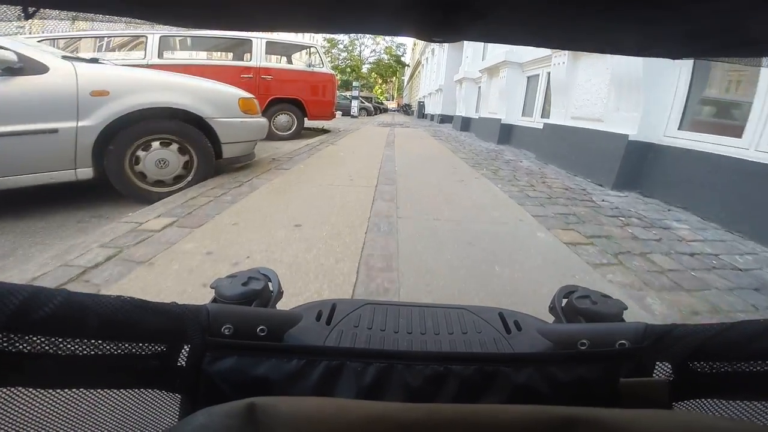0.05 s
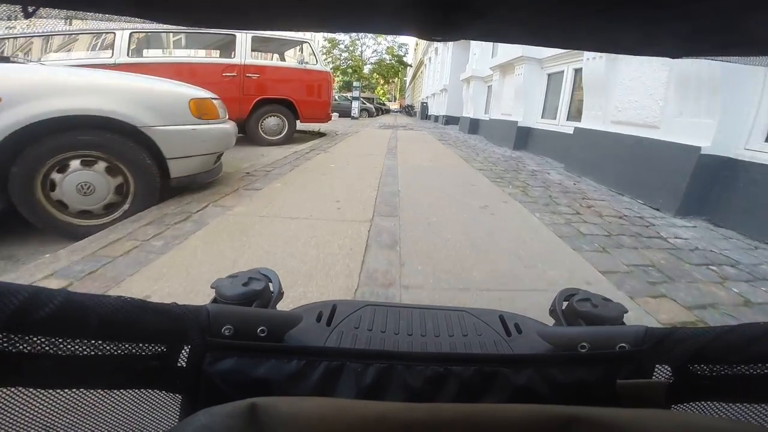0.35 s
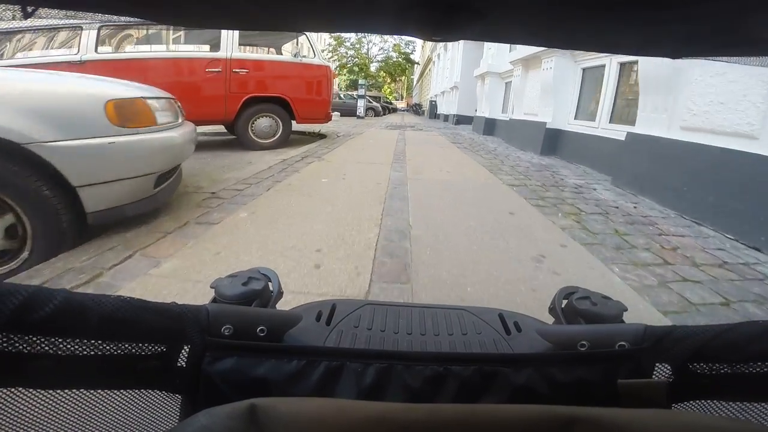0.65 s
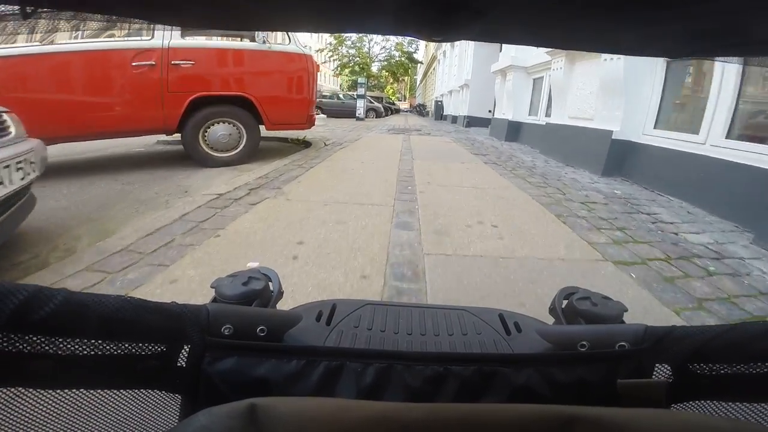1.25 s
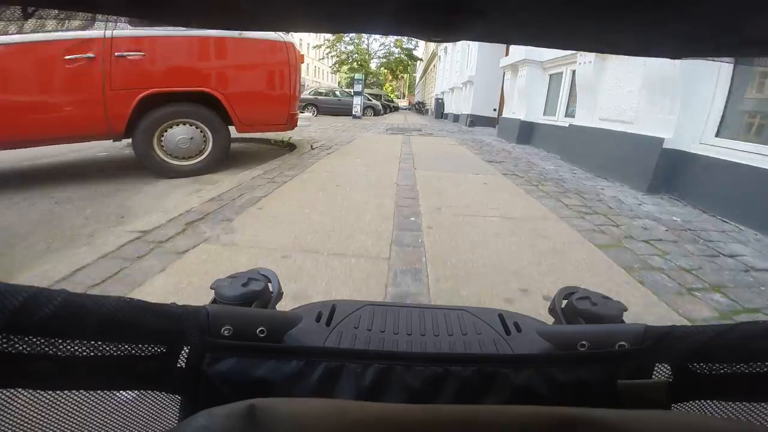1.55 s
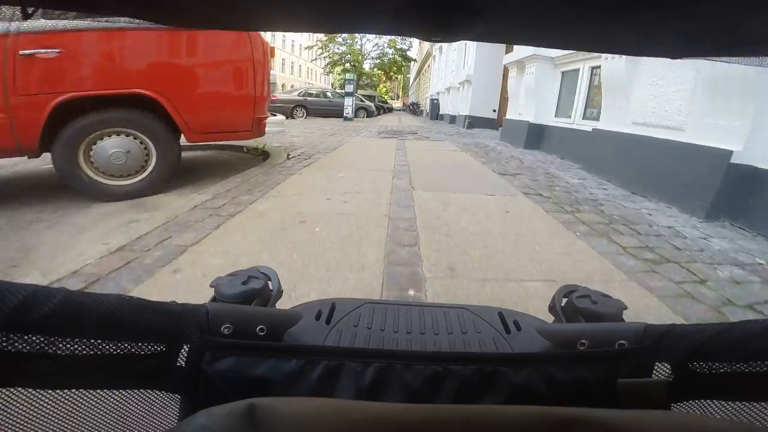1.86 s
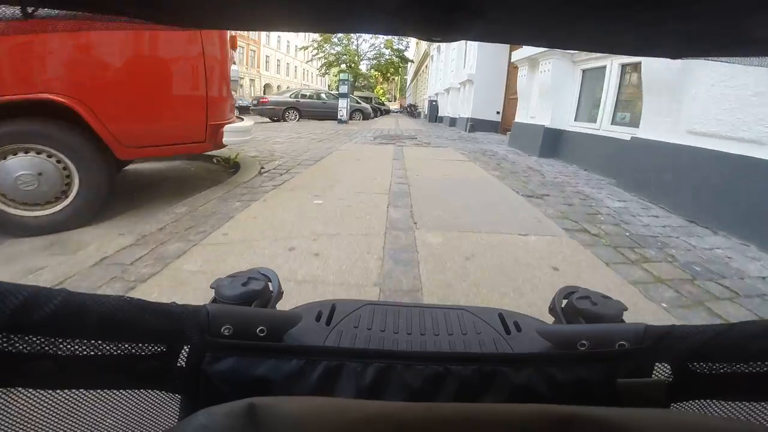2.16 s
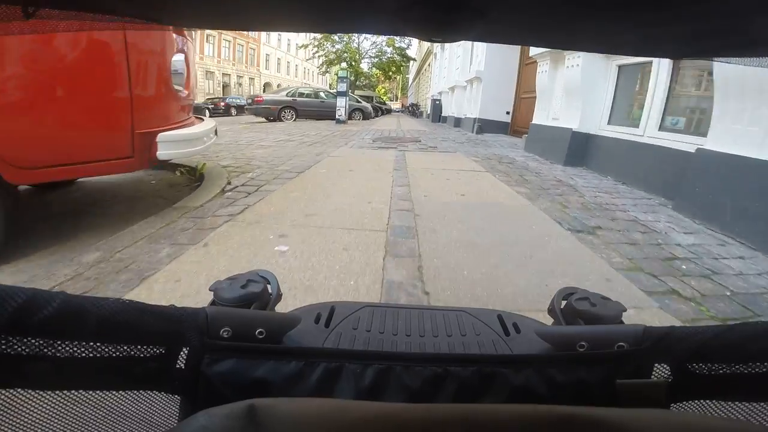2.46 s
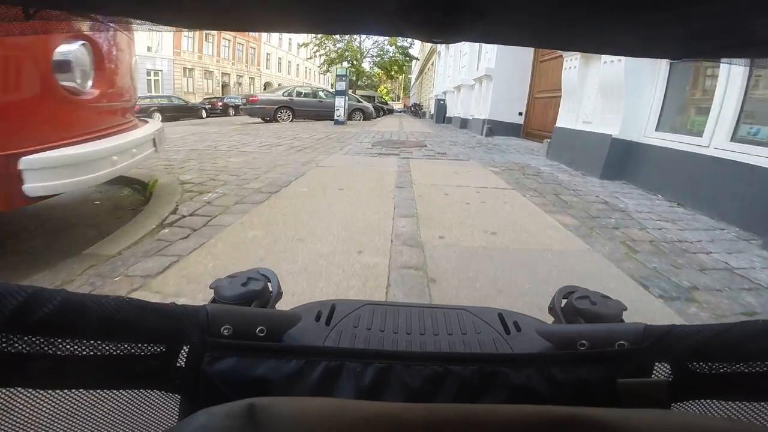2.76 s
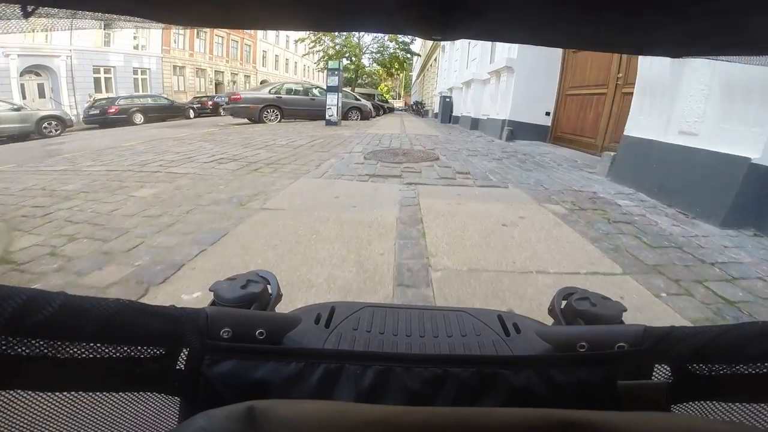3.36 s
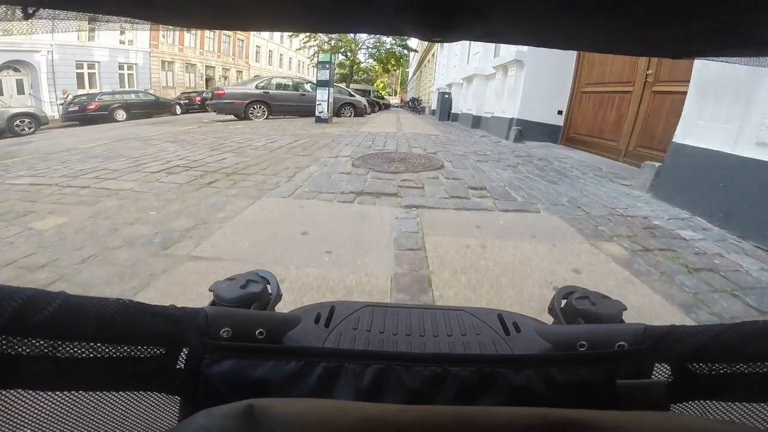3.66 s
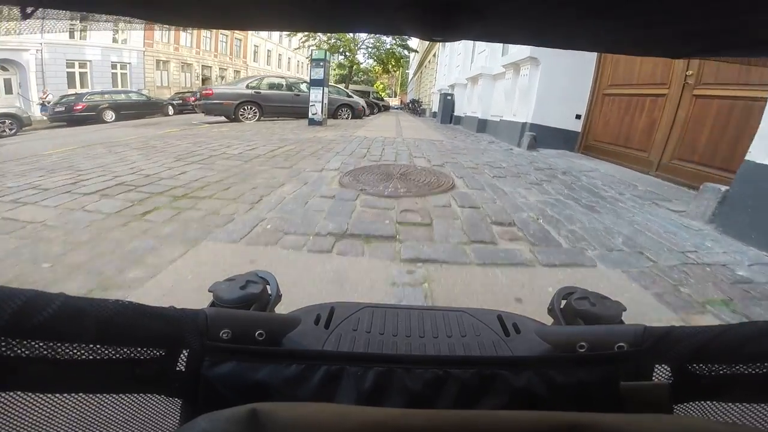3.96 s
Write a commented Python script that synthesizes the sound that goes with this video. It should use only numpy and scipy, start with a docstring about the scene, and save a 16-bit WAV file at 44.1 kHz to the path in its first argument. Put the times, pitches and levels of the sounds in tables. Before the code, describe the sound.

A rolling pram rumbles, bumps and rattles along a pavement, then clacks against a stone edge.

```python
"""Pram rolling on paving slabs, heard from inside the carriage.
Grit under the tyres taps the frame and the sprung body rumbles; slab joints jolt it.
Plastic wheel mounts knock, handle tubes rattle, metal fittings tick, plastic joints creak.
Dry clicks, faint squeaks and rustles come and go. Near the end one stone edge gives a sharp clack."""
import sys
import numpy as np
from scipy import signal
from scipy.fft import rfft, irfft
from scipy.io import wavfile
from scipy.ndimage import uniform_filter1d, minimum_filter1d

SR = 44100
rng = np.random.default_rng(int(sys.argv[2]) if len(sys.argv) > 2 else 0)


def master(y):
    """Save y as 16-bit WAV."""
    cut = np.clip(np.atleast_2d(y).T, -1, 1)
    pcm = np.round(cut * 32767)  # scale
    wavfile.write(sys.argv[1], SR, pcm.astype(np.int16))


N = 176400
TIME_S, RING_TIME_S = np.arange(N) / SR, np.arange(4096) / SR
SCUFF_LEAD_S = 0.007  # a wheel scuffs an edge before it knocks

# rolling rumble: freq_hz, gain_db
RUMBLE_SPECTRUM = [(15, -19), (28, -14.5), (45, -3), (58, 2), (68, 7), (82, -10.5), (100, -10.5),
                   (128, -25.5), (163, -12), (195, -18.5), (310, -18.5), (365, -34.5), (415, -31),
                   (490, -50), (700, -48.5), (1500, -57), (4000, -85)]
# contour of the deep rumble: time_s, level_db
SWAY_CONTOUR = [(0.0, -13), (0.2, -19), (0.38, -21.5), (0.66, -17), (0.78, -19.5), (1.0, -22), (1.49, -20),
                (1.74, -23.5), (2.08, -23), (2.22, -22), (2.33, -19.5), (2.47, -20), (2.58, -23.5),
                (3.3, -24), (3.43, -23.5), (4.0, -25.5)]
# contour of the grit: time_s, level_db
GRIT_CONTOUR = [(0.0, -53), (0.07, -54.5), (0.17, -47.5), (0.37, -47), (0.5, -48), (0.67, -48.5),
                (0.9, -51.5), (1.5, -47), (1.71, -51.5), (2.36, -54.5), (2.52, -52), (3.02, -53.5),
                (3.2, -48), (3.41, -59), (3.6, -47), (3.75, -49), (3.9, -46.5), (4.0, -70)]
# damped crunch of plastic and fabric: freq_hz, gain_db
CRUNCH_SPECTRUM = [(100, -12), (300, 14.5), (550, 4), (1000, 0.5), (1450, -4), (2200, -2), (3050, -22),
                   (3300, -32), (6200, -37.5), (7200, -53), (15000, -67)]
# frame: freq_hz, gain_db, t60_s
FRAME_MODES = [(762, -5.5, .05), (937, -4.5, .035), (988.6, -0.5, .04), (1092, -6, .03), (1276, -7, 0.035),
               (1360, 0, .035), (1426.5, -5, 0.058), (1693, -8, 0.025), (1838, -10, 0.051),
               (1979, -9.5, .04), (2210, -11.5, 0.042), (2403, -9, 0.051)]
# handle tubes: freq_hz, gain_db, t60_s
TUBE_MODES = [(2660, -1, 0.017), (2849, 5.5, 0.034), (2948, -6, 0.042), (3056, -0.5, 0.038)]
# metal fittings: freq_hz, gain_db, t60_s
FITTING_MODES = [(3910, -7, 0.052), (4410, -14, 0.043), (5100, -19, .03), (5624, -8.5, .035),
                 (5704, -5.5, 0.039), (5890, -6.5, .035)]
# wheel mount knocks: start_s, level_db, treble_db, pitch_hz, decay_s
MOUNT_KNOCKS = [(0.0, -17, -11.5, 1380, 0.0038), (0.125, -37, -13, 1425, 0.0015),
                (0.163, -32.5, -21, 982, 0.003), (0.175, -28, -33, 880, 0.0043),
                (0.181, -26.5, -10, 1300, 0.0037), (0.222, -38.5, -22.5, 1380, 0.0023),
                (0.278, -20.5, -22, 1030, 0.0087), (0.283, -24, -16, 770, 0.0027),
                (0.293, -22, -16, 990, 0.0031), (0.341, -34.5, -7, 651, 0.0051),
                (0.354, -31.5, -15, 651, 0.004), (0.377, -36, -18, 926, 0.0035),
                (0.401, -36.5, -26, 721, 0.0031), (0.423, -32.5, -30, 719, 0.0026),
                (0.437, -40.5, -33, 953, 0.005), (0.454, -38, -22, 764, 0.0048),
                (0.507, -33, -23, 1360, 0.0057), (0.52, -28.5, -22, 980, 0.0077),
                (0.538, -21, -14, 994, 0.0017), (0.624, -33, -25, 976, 0.004),
                (0.671, -36.5, -26, 694, 0.0039), (0.682, -33.5, -16.5, 896, 0.004),
                (0.87, -38.5, -10, 900, 0.004), (0.902, -33.5, -21, 923, 0.004),
                (0.928, -24.5, -21, 1380, 0.0038), (0.944, -20.5, -12, 1320, 0.0042),
                (0.97, -26.5, -20.5, 956, 0.0029), (0.982, -35.5, -15, 651, 0.0055),
                (1.002, -32, -28, 980, 0.0062), (1.142, -31, -15, 1110, 0.0053),
                (1.15, -37, -14, 1340, 0.0017), (1.204, -35, -4.5, 999, 0.0033),
                (1.287, -22, -18, 1034, 0.0015), (1.298, -27.5, -16, 686, 0.006),
                (1.434, -35, -9, 966, 0.0044), (1.451, -36.5, -19, 756, 0.004),
                (1.495, -27.5, -17, 1400, 0.0044), (1.536, -24, -18, 931, 0.0036),
                (1.555, -14.5, -26, 1100, 0.0044), (1.564, -27, -31, 1230, 0.0046),
                (1.581, -33, -18, 970, 0.004), (1.609, -30.5, -10, 1340, 0.0045),
                (1.691, -30, -4, 904, 0.0036), (1.915, -35.5, -29, 1350, 0.0034),
                (1.947, -24, -11.5, 1390, 0.0064), (1.96, -23, -18.5, 1350, 0.0044),
                (1.997, -35.5, -11, 747, 0.0036), (2.043, -27, -19, 1400, 0.002),
                (2.089, -33.5, -21, 704, 0.0038), (2.309, -30.5, -7.5, 1015, 0.0098),
                (2.325, -30.5, -15, 802, 0.004), (2.347, -37, -8, 682, 0.0057),
                (2.44, -38.5, -18, 1320, 0.0054), (2.576, -30.5, -18, 903, 0.0094),
                (2.59, -23.5, -15, 1330, 0.0085), (2.744, -35.5, -17, 662, 0.0028),
                (2.768, -29.5, -3.5, 1950, 0.0057), (2.822, -35, -23, 930, 0.003),
                (2.982, -30.5, -29, 1010, 0.0035), (2.986, -24, -32, 990, 0.0034),
                (3.024, -32, -14.5, 1070, 0.003), (3.117, -38, -20, 2180, 0.0045),
                (3.194, -32, -9.5, 1300, 0.003), (3.291, -38.5, -10, 980, 0.0056),
                (3.314, -32.5, -7, 1410, 0.0043), (3.334, -29, -12, 1240, 0.0037),
                (3.373, -40.5, -6, 651, 0.0035), (3.427, -39, -11, 1280, 0.005),
                (3.551, -39.5, -30, 988, 0.0036), (3.633, -24, -27, 710, 0.004),
                (3.665, -26.5, -25, 727, 0.0032), (3.696, -27.5, -38, 965, 0.0021),
                (3.727, -30, -33, 743, 0.0034), (3.747, -25.5, -27, 734, 0.0062),
                (3.781, -32.5, -29, 655, 0.004), (3.854, -22, -12.5, 1350, 0.0031),
                (3.892, -35, -31, 1390, 0.004), (3.914, -36.5, -23, 1320, 0.0036),
                (3.933, -33.5, -5, 885, 0.004)]
# dry snap: freq_hz, gain_db
SNAP_SPECTRUM = [(300, -29.5), (1500, 15), (3000, -8), (6000, -2.5), (7500, -9.5), (10000, -30),
                 (13500, -38.5), (16000, -49.5)]
# sprung body bounces: start_s, level_db
BODY_BOUNCES = [(0.003, -6), (0.18, -4), (0.287, -5.5), (0.322, -3), (0.533, -1), (0.672, -3),
                (0.732, -11.5), (0.926, -5.5), (1.017, -4), (1.293, -2.5), (1.357, -6.5), (1.423, -7),
                (1.555, -4.5), (1.811, -12), (1.955, -4), (2.029, -31), (2.184, -17), (2.311, 0),
                (2.373, -3), (2.58, 0.5), (2.757, -9), (2.826, -12), (2.906, -6.5), (2.981, -6),
                (3.262, -8.5), (3.333, -8), (3.6, -1.5), (3.649, -5.5), (3.75, -16)]
# sprung body: freq_hz, gain_db, t60_s
BODY_MODES = [(66.73, 3.5, 0.21), (50.7, -10.5, 0.098), (98, -0.5, 0.08)]
# tyre drops into a joint: start_s, level_db
JOINT_THUDS = [(0.001, -9), (0.175, -13), (0.274, -14.5), (0.528, -22), (0.544, -16.5), (0.926, -16.5),
               (1.293, -28), (1.556, -18), (1.571, -12.5), (1.956, -19), (2.04, -13), (2.312, -13.5),
               (2.579, -10), (2.769, -19), (2.86, -33), (3.333, -14.5), (3.602, -9.5), (3.623, -6.5),
               (3.745, -12.5), (3.857, -13.5)]
# carrycot: freq_hz, gain_db, t60_s
COT_MODES = [(169, -2.5, 0.073), (231.7, -7.5, 0.12), (276, -0.5, 0.083), (306.4, -1, 0.094),
             (403.2, -10.5, 0.082)]
# dry clicks: start_s, level_db
DRY_CLICKS = [(.0315, -34), (.0495, -40.5), (.3365, -53), (1.5845, -45), (2.613, -41), (2.629, -66.5)]
# handle rattles: start_s, level_db
HANDLE_RATTLES = [(0.2842, -34), (0.3042, -27.5), (0.3144, -31), (0.5816, -37), (0.6804, -45),
                  (1.0183, -41.5), (1.1774, -44.5), (1.205, -45), (1.3, -31), (1.325, -38.5), (1.4656, -40),
                  (1.5477, -28), (1.6086, -41), (2.6369, -40), (2.6602, -38.5), (2.6775, -36),
                  (3.1894, -35.5), (3.2014, -45), (3.2923, -33), (3.673, -42.5), (3.931, -37)]
# fitting ticks: start_s, level_db
FITTING_TICKS = [(0.2923, -47), (0.3063, -43.5), (0.341, -47.5), (0.5366, -47), (0.58, -55), (0.7292, -50),
                 (0.9438, -37.5), (0.9966, -57), (1.205, -50), (1.3026, -44.5), (1.4666, -46.5),
                 (1.56, -50), (1.614, -53), (1.6897, -45), (1.9605, -45), (2.583, -51), (2.6764, -59.5),
                 (2.7686, -38), (3.855, -51.5), (3.9335, -56)]
# thin squeaks: start_s, length_s, pitch_hz, level_db
THIN_SQUEAKS = [(1.442, 0.097, 6500, -62), (2.328, 0.083, 6440, -66.5)]
# soft rustles: start_s, length_s, level_db
SOFT_RUSTLES = [(2.081, .095, -65.5), (2.202, .095, -65.5), (3.176, 0.061, -66.5), (3.241, .2, -68),
                (3.545, 0.056, -65), (3.684, .06, -68.5)]
# rustle: freq_hz, gain_db
RUSTLE_SPECTRUM = [(4500, -29), (5800, -1), (6600, -7), (7600, -14), (9200, -19), (10400, -7.5),
                   (11500, -15), (15000, -32)]
# plastic joint creaks: start_s, length_s, pitch_hz, level_db
PLASTIC_CREAKS = [(2.461, .016, 2190, -46), (2.475, 0.032, 1784, -44.5), (3.115, 0.012, 2170, -41.5),
                  (3.132, 0.013, 1880, -47), (3.225, .03, 2110, -47.5), (3.274, 0.022, 2110, -48),
                  (3.83, 0.01, 2080, -43.5)]
# hard plastic ring: freq_hz, gain_db, t60_s
CLACK_MODES = [(992, -3.5, 0.074), (1320, 0, 0.05), (1690, -7, 0.034), (1947, 0.5, 0.055), (2307, 1, 0.039),
               (2579, -3, .03), (2940, 2.5, 0.03), (4020, -4, .028), (4280, -7.5, .022), (5700, 2.5, 0.025),
               (5950, -2, 0.028)]
# hard plastic snap: freq_hz, gain_db
CLACK_SPECTRUM = [(300, -12), (550, -4), (950, 0.5), (1500, 0.5), (2000, 1.5), (2900, 2), (3350, -21),
                  (4100, -4), (4900, -17.5), (5850, -3), (6700, -26), (8500, -32), (12300, -34),
                  (15500, -47)]
# electronic whine: freq_hz, level_db
WHINE_TONES = [(8781, -86), (11715, -79)]
# microphone hiss: freq_hz, gain_db
HISS_SPECTRUM = [(300, -19.5), (2000, 1.5), (3500, 6), (6000, 1), (8000, -3), (11500, -3.5),
                 (12300, -12), (15500, -10.5)]


def amp(db):
    return 10 ** (np.asarray(db) / 20)


def unit_rms(x):
    return x / np.sqrt(np.mean(x ** 2) + 1e-20)


def unit_peak(x):
    """Scales the loudest 3 ms to rms 1."""
    return x / np.sqrt(uniform_filter1d(x ** 2, size=130).max() + 1e-20)


def add(mix, start_s, sound):
    part = mix[max(round(start_s * SR), 0):][:len(sound)]
    part += sound[:len(part)]


def wander(n, smooth_samples):
    return unit_rms(uniform_filter1d(rng.standard_normal(n), size=smooth_samples))


def coloured(x, spectrum):
    """Shapes the spectrum; output rms 1."""
    hz, db = np.transpose(spectrum)
    bins_hz = np.fft.rfftfreq(len(x), 1 / SR)
    gain = amp(np.interp(np.log(bins_hz + 1), np.log(hz), db))
    return unit_rms(irfft(rfft(x) * gain, len(x)))


def muffled(x, cutoff_hz):
    """Rubber and fabric absorb the treble."""
    return signal.sosfilt(signal.butter(6, cutoff_hz, fs=SR, output="sos"), x)


def focused(rows, pitch_hz, cut_db=10):
    """A contact favours its own pitch; full cut from one octave away."""
    return [(hz, db - cut_db * min(abs(np.log2(hz / pitch_hz)), 1), *rest) for hz, db, *rest in rows]


def ring(modes, scatter_db=0, detune=0):
    """Decaying modes, varied per point of contact."""
    hz, db, t60_s = np.transpose(modes)[:, :, None]
    gain_draw, pitch_draw, sign_draw = rng.uniform(-1, 1, (len(modes), 3)).T[:, :, None]
    gain = amp(db + scatter_db * gain_draw) * np.sign(sign_draw)
    tones = np.sin(2 * np.pi * hz * (1 + detune * pitch_draw) * RING_TIME_S)
    return (gain * amp(-60 * RING_TIME_S / t60_s) * tones).sum(0)


def chatter(sound, decay_s, hits_per_s, first_gain):
    """One contact, then a dying volley."""
    t = np.arange(SR // 16) / SR
    hits = rng.standard_normal(len(t)) * (rng.random(len(t)) < hits_per_s / SR) * np.exp(-t / decay_s)
    hits[0] = first_gain
    return unit_peak(signal.fftconvolve(sound, hits)[:len(sound)])


def burst(spectrum, rise_s, decay_s, tail_db, tail_s):
    """Noise puff with a softer, longer tail."""
    t = RING_TIME_S
    envelope = (1 - np.exp(-t / rise_s)) * (np.exp(-t / decay_s) + amp(tail_db) * np.exp(-t / tail_s))
    return unit_peak(coloured(rng.standard_normal(len(t)), spectrum) * envelope)


def rumble(level_db=-19.5, deep_hz=110, sway_depth=0.88):
    """Rough concrete shakes the sprung body, more on some slabs than others."""
    noise = amp(level_db) * coloured(rng.standard_normal(N), RUMBLE_SPECTRUM)
    deep = signal.sosfiltfilt(signal.butter(2, deep_hz, fs=SR, output="sos"), noise)
    sway_db = np.interp(TIME_S, *np.transpose(SWAY_CONTOUR))
    return noise - deep + deep * amp(sway_depth * (sway_db - sway_db.mean()))


def grit(grains_per_s=900, spread_db=3.5, swell_db=3):
    """Grains crunch under the tyres and tap single modes of frame, tubes and fittings."""
    flutter = sum(np.sin(2 * np.pi * (hz * TIME_S + rng.random())) for hz in np.geomspace(6, 45, 24))
    swell = amp(swell_db * unit_rms(flutter))

    def grains(per_s):
        hit = rng.random(N) < per_s / SR
        sizes = rng.laplace(0, 1, SR // 4)[:hit.sum()]
        train = np.zeros(N)
        train[hit] = np.sign(sizes) * amp(spread_db * np.minimum(abs(sizes), 3.5))
        return train * swell

    def tapped(modes):
        per_s = grains_per_s / len(modes)
        return unit_rms(sum(signal.oaconvolve(grains(per_s), ring([mode]))[:N] for mode in modes))

    crunch = amp(-4) * coloured(grains(grains_per_s), CRUNCH_SPECTRUM)
    taps = amp(-4) * tapped(FRAME_MODES) + amp(-13) * tapped(TUBE_MODES)
    metal = amp(-27) * tapped(FITTING_MODES)
    level_db = np.interp(TIME_S, *np.transpose(GRIT_CONTOUR))
    return (muffled(crunch + taps, cutoff_hz=3300) + metal) * amp(level_db)


def knocks(rise_s=0.0011, scuff_db=-14, grit_db=-30):
    """After a scuff, wheel mounts chatter on the frame, ring the tubes and crush a little grit."""
    out, crushed = np.zeros((2, N))
    t = RING_TIME_S
    attack = 1 - np.exp(-t / rise_s)
    scuff_envelope = t / SCUFF_LEAD_S * np.exp(1 - t / SCUFF_LEAD_S)
    for start_s, db, treble_db, pitch_hz, decay_s in MOUNT_KNOCKS:
        spectrum = focused(CRUNCH_SPECTRUM, pitch_hz)
        frame = ring(focused(FRAME_MODES, pitch_hz), scatter_db=6.5, detune=0.014) * attack
        frame = chatter(frame, decay_s, hits_per_s=1800, first_gain=1.1)
        tubes = ring(TUBE_MODES, scatter_db=2.5, detune=0.006) * attack
        tubes = chatter(tubes, decay_s, hits_per_s=1300, first_gain=1)
        crunch = burst(spectrum, rise_s=0.0018, decay_s=decay_s, tail_db=-15, tail_s=0.025)
        add(out, start_s, amp(db) * (amp(-5) * frame + amp(-8) * crunch + amp(treble_db - 5.5) * tubes))
        scuff = coloured(rng.standard_normal(len(t)), spectrum) * scuff_envelope
        add(out, start_s - SCUFF_LEAD_S, amp(db + scuff_db) * scuff)
        snap = burst(SNAP_SPECTRUM, rise_s=0.0001, decay_s=0.0004, tail_db=-25, tail_s=0.004)
        crackle = chatter(snap, decay_s=0.02, hits_per_s=830, first_gain=0.2)
        add(crushed, start_s, amp(db + grit_db) * crackle)
    return muffled(out, cutoff_hz=3600) + crushed


def jolts(bounce_db=-3, bounce_rise_s=0.0095, thud_db=-4, thud_rise_s=0.0024):
    """Slab joints swing the sprung body and thump the carrycot."""
    out, t = np.zeros(N), np.arange(SR // 4) / SR
    swing = sum(amp(db - 60 * t / t60_s) * np.sin(2 * np.pi * hz * t) for hz, db, t60_s in BODY_MODES)
    bounce = unit_peak(swing * (1 - np.exp(-(t / bounce_rise_s) ** 2)))
    for start_s, db in BODY_BOUNCES:
        add(out, start_s, amp(db + bounce_db) * bounce)
    attack = 1 - np.exp(-RING_TIME_S / thud_rise_s)
    for start_s, db in JOINT_THUDS:
        thud = unit_peak(ring(COT_MODES, scatter_db=0.5, detune=0.046) * attack)
        add(out, start_s, amp(db + thud_db) * thud)
    return out


def clicks():
    """Small dry snaps of noise."""
    out = np.zeros(N)
    for start_s, db in DRY_CLICKS:
        snap = burst(SNAP_SPECTRUM, rise_s=0.0001, decay_s=0.0007, tail_db=-35.5, tail_s=0.005)
        add(out, start_s, amp(db) * snap)
    return out


def rattles(gain_db=-4):
    """Loose handle tubes chatter and ring."""
    out = np.zeros(N)
    for start_s, db in HANDLE_RATTLES:
        tubes = ring(TUBE_MODES, scatter_db=1.5, detune=0.01)
        tubes = chatter(tubes, decay_s=0.009, hits_per_s=510, first_gain=0.94)
        add(out, start_s, amp(db + gain_db) * tubes)
    return muffled(out, cutoff_hz=3400)


def ticks(metal_db=-4, snap_db=-14):
    """Small metal fittings strike: a snap and a high ring."""
    out = np.zeros(N)
    for start_s, db in FITTING_TICKS:
        metal = ring(FITTING_MODES, scatter_db=5, detune=0.008)
        metal = chatter(metal, decay_s=0.006, hits_per_s=1200, first_gain=1.1)
        snap = burst(SNAP_SPECTRUM, rise_s=0.0006, decay_s=0.002, tail_db=-12, tail_s=0.012)
        add(out, start_s, amp(db + metal_db) * metal + amp(db + snap_db) * snap)
    return out


def squeaks(waver=0.012, octave_db=-5):
    """Thin wavering tones with an octave above."""
    out = np.zeros(N)
    for start_s, length_s, pitch_hz, db in THIN_SQUEAKS:
        n = int(length_s * SR)
        phase = 2 * np.pi * np.cumsum(pitch_hz * (1 + waver * wander(N, smooth_samples=40)[:n])) / SR
        tone = unit_rms(np.sin(phase) + amp(octave_db) * np.sin(2 * phase))
        add(out, start_s, amp(db) * signal.windows.tukey(n, 0.3) * tone)
    return out


def rustles(clump_db=3):
    """Soft high noise in clumps."""
    out = np.zeros(N)
    for start_s, length_s, db in SOFT_RUSTLES:
        n = int(length_s * SR)
        clumps = amp(clump_db * wander(N, smooth_samples=120))
        noise = coloured(rng.standard_normal(N) * clumps, RUSTLE_SPECTRUM)[:n]
        add(out, start_s, amp(db) * signal.windows.tukey(n, 0.3) * noise)
    return out


def creaks(width_hz=110):
    """Plastic joints stick and slip: brief fuzzy tones."""
    out = np.zeros(N)
    for start_s, length_s, pitch_hz, db in PLASTIC_CREAKS:
        t = np.arange(int(length_s * SR)) / SR
        hz = pitch_hz + width_hz * wander(SR // 4, smooth_samples=60)[:len(t)]
        tone = np.sqrt(2) * np.sin(2 * np.pi * np.cumsum(hz) / SR)
        add(out, start_s, amp(db) * np.sin(np.pi * t / length_s) * tone)
    return out


def clack(start_s=3.606, level_db=-14, rise_s=0.0011, scuff_db=-17):
    """A wheel scuffs a stone edge, then hits it: hard plastic snaps and rings."""
    out = np.zeros(N)
    plastic = unit_peak(ring(CLACK_MODES) * (1 - np.exp(-(RING_TIME_S / rise_s) ** 2)))
    snap = burst(CLACK_SPECTRUM, rise_s=0.0022, decay_s=0.0033, tail_db=-24, tail_s=0.014)
    scuff = burst(CRUNCH_SPECTRUM, rise_s=0.0088, decay_s=0.02, tail_db=-15, tail_s=0.025)
    add(out, start_s, amp(level_db) * (plastic + snap))
    add(out, start_s - SCUFF_LEAD_S, amp(level_db + scuff_db) * scuff)
    return out


def scene():
    ride = jolts() + rumble() + grit() + knocks()
    hardware = rattles() + ticks() + clicks()
    return (ride + hardware + clack() + creaks() + squeaks() + rustles())[None]


def record(dry, hiss_db=-67.5, ceiling=0.92, cutoff_hz=15700):
    """Electronic whine, microphone hiss, peak limiter, band limit."""
    whine = sum(amp(db) * np.sqrt(2) * np.sin(2 * np.pi * hz * TIME_S) for hz, db in WHINE_TONES)
    mix = dry + whine + amp(hiss_db) * coloured(rng.standard_normal(N), HISS_SPECTRUM)
    gain = ceiling / np.maximum(abs(mix), ceiling)
    gain = uniform_filter1d(minimum_filter1d(gain, size=900), size=700)  # hold, then smooth
    lowpass = signal.firwin(511, cutoff_hz, window=("kaiser", 9), fs=SR)
    return signal.oaconvolve(mix * gain, lowpass[None], "same")


dry = scene()
out = record(dry)
master(out)
```